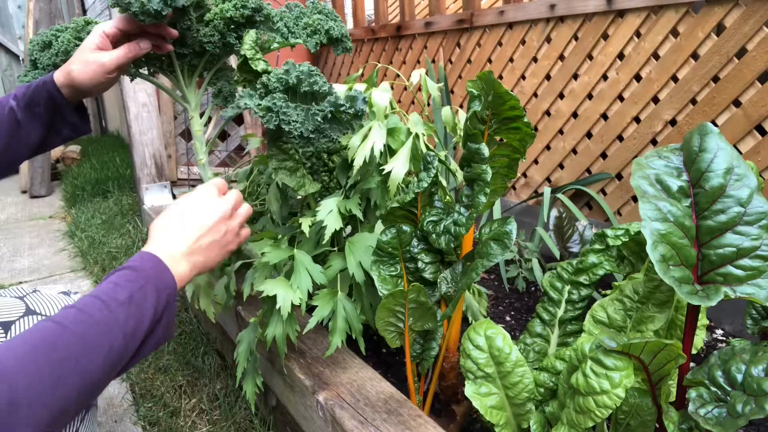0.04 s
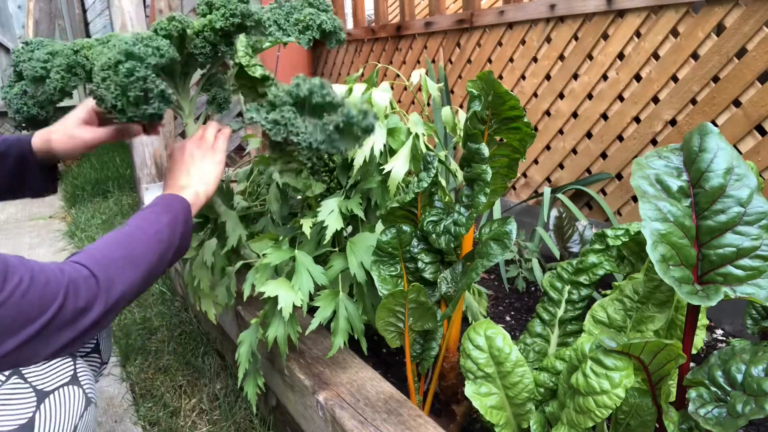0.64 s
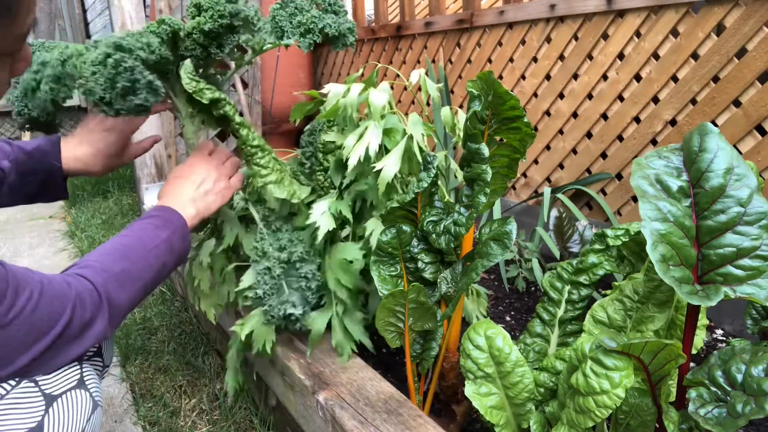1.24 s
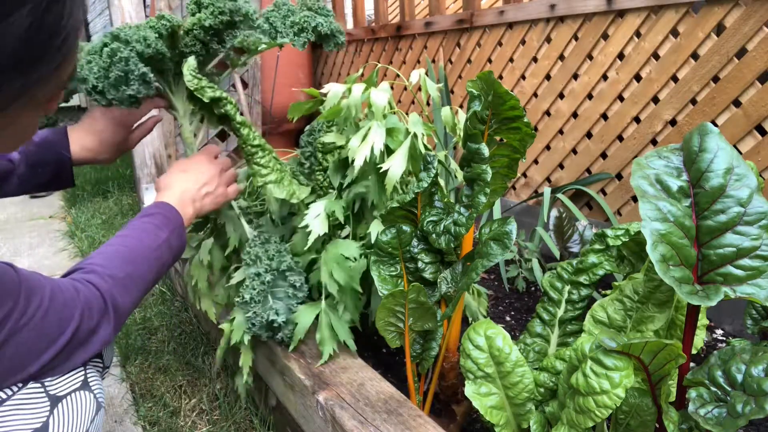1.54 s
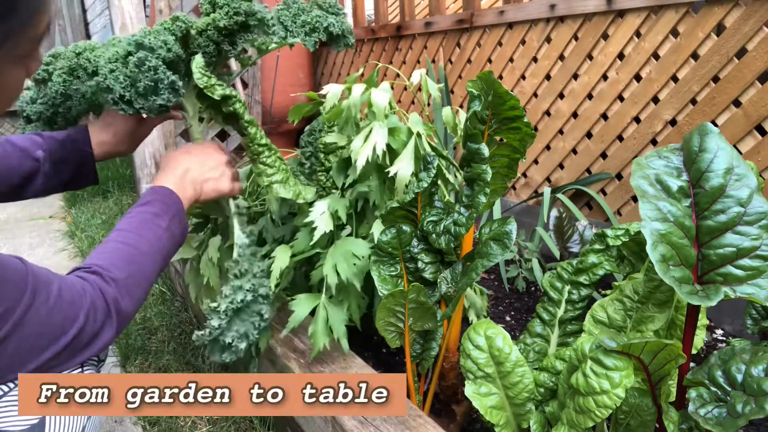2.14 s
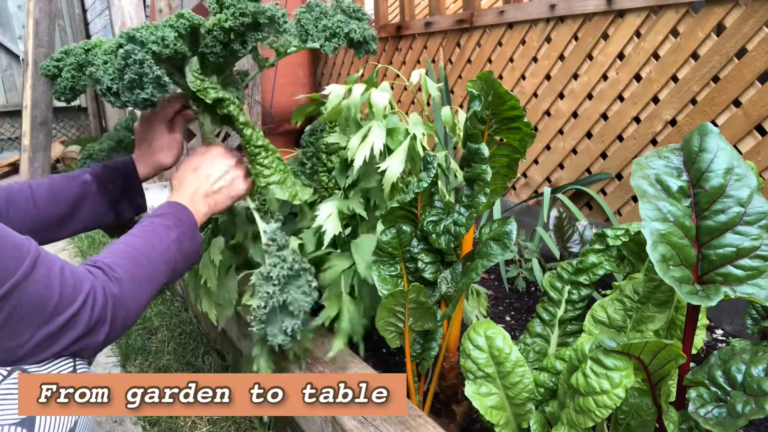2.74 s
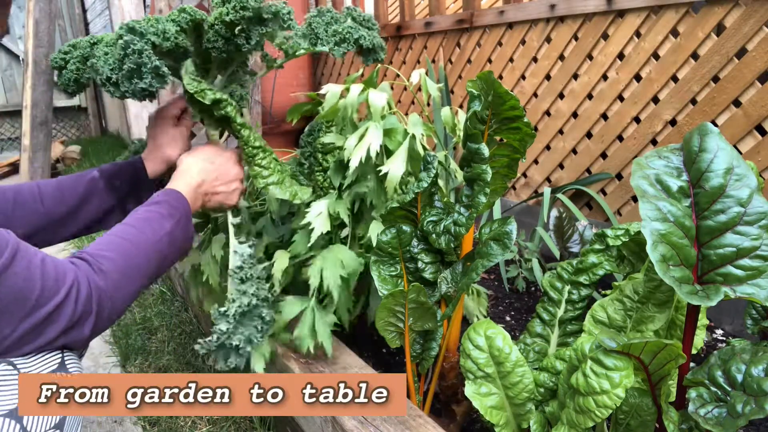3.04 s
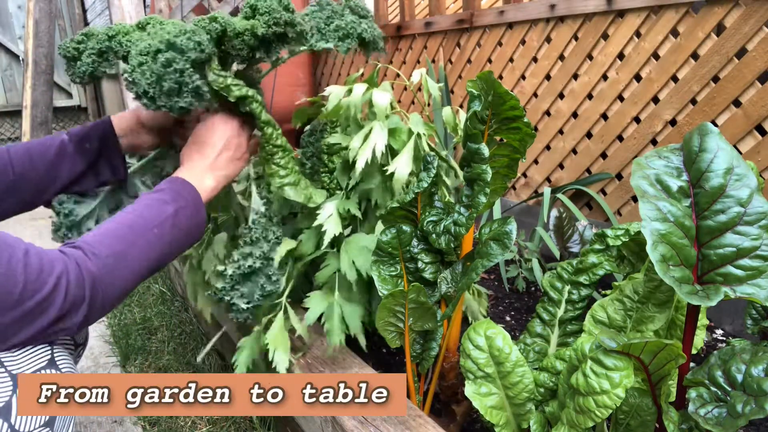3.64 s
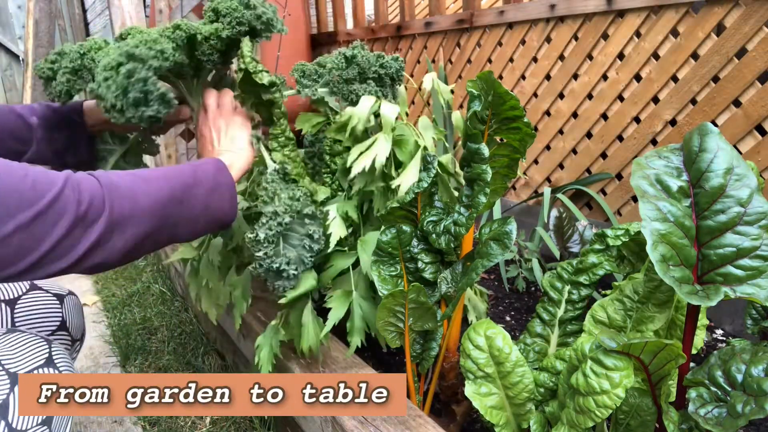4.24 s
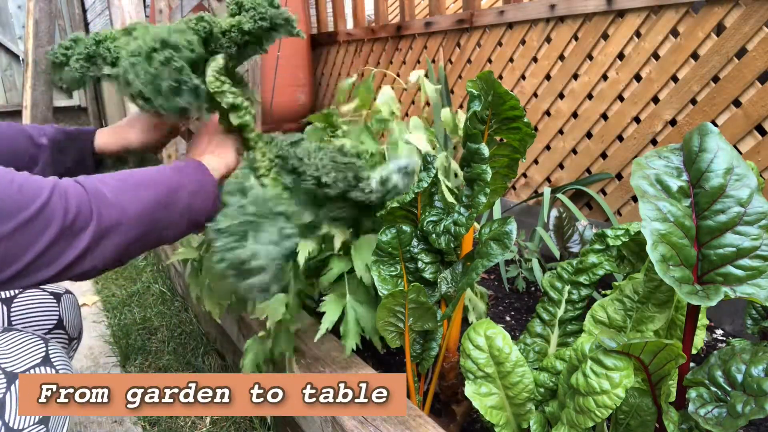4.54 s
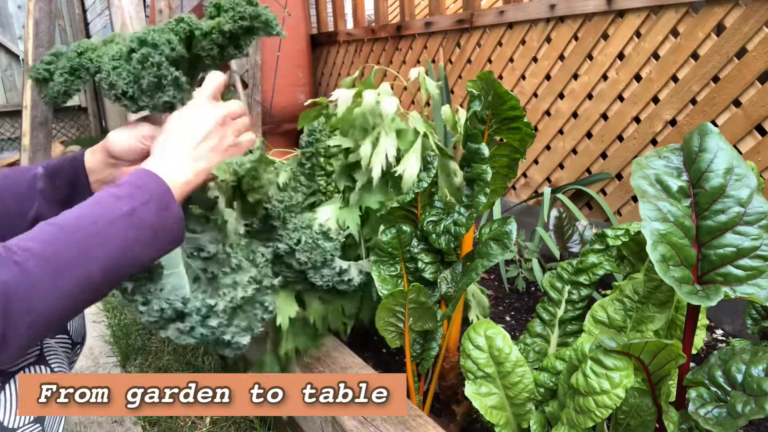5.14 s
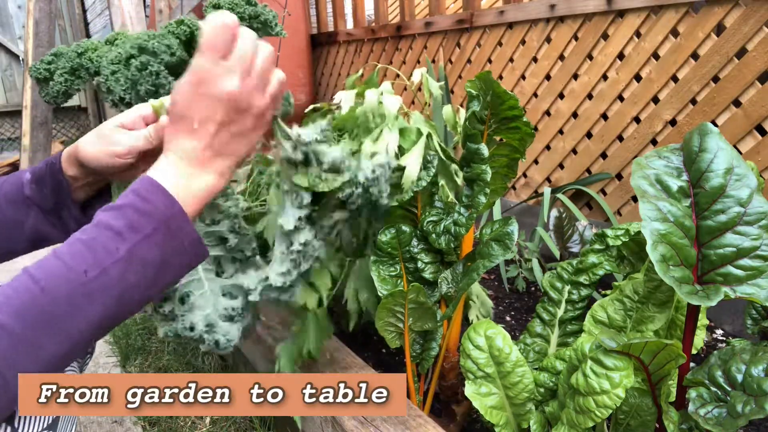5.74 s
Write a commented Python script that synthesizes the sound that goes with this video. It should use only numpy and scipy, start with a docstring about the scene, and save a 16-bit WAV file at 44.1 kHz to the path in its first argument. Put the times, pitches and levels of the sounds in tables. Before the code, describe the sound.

Hands pick curly kale in a quiet garden, with crisp stem snaps between bouts of leaf rustling that grows louder toward the end.

```python
"""Kale is picked by hand in a small fenced garden, over quiet outdoor air and a faint motor hum.
Curly leaves crinkle and rub; at 1.3 s a stem snaps in a run of bursting fibres and the stalk thumps back.
A lighter snap follows, then a far engine swells and fades around the next big snap at 3.1 s.
The last stem goes at 4.3 s, and the leaves rustle at their loudest to the end, with small cracks.
The bed and the fence scatter the snaps and the rustle."""
import sys
import numpy as np
from scipy import signal
from scipy.fft import rfft, irfft
from scipy.io import wavfile
from scipy.ndimage import uniform_filter1d

SR = 44100
rng = np.random.default_rng(int(sys.argv[2]) if len(sys.argv) > 2 else 0)


def put_to_file(sound):
    """Save the sound as 16-bit audio at rate SR, in the file named by the first command-line argument."""
    columns = np.atleast_2d(sound).T  # one column per channel
    safe = np.clip(columns, -1, 1)
    whole_steps = np.round(safe * 32767)
    wavfile.write(sys.argv[1], SR, whole_steps.astype(np.int16))


N = 254898
T = np.arange(N) / SR

# Tone of the outdoor air. Each row: frequency in Hz, level in dB.
AIR_TONE = [(15, -63), (25, -31), (53, -7), (123, -2.5), (161, -5.5), (242, -6), (516, -13), (575, -8),
            (624, -9.5), (818, -13), (1100, -13.5), (1330, -17.5), (5730, -25.5), (16000, -35)]
# The far engine's swell and fade. Each row: time in seconds, level in dB.
ENGINE_SWELL = [(0, -82), (2.1, -71), (2.7, -63), (3.75, -63), (4.3, -69), (5.78, -76)]
# Soft bumps of hands and swinging stalks. Each row: start in seconds, level in dB, pitch in Hz,
# decay in seconds.
SOFT_KNOCKS = [(3.094, -48, 268, 0.04), (3.683, -42.5, 420, 0.011), (4.318, -41, 260, 0.021),
               (5.547, -43.5, 231, 0.044), (5.639, -51, 212, 0.14)]
# Leaf sliding on leaf. Each row: start and length in seconds, level in dB, first and last pitch in Hz,
# nominal slips per second.
LEAF_RUBS = [(0.517, 0.035, -47.5, 3230, 2740, 500), (0.617, 0.096, -41.5, 1550, 1840, 250),
             (0.72, 0.1, -53.5, 1600, 1900, 430), (0.824, 0.021, -44, 3920, 3500, 700),
             (3.965, 0.028, -48, 1400, 1480, 700), (4.429, 0.062, -38, 2000, 1790, 830),
             (4.819, 0.085, -49.5, 1330, 1390, 114), (4.989, 0.14, -45.5, 1850, 1960, 600),
             (5.144, 0.062, -38.5, 1780, 1700, 600), (5.311, 0.12, -40.5, 4450, 3650, 1350),
             (5.418, 0.068, -35.5, 1800, 2390, 860), (5.492, 0.3, -46, 2470, 2250, 395)]
# A hand moves through the leaves. Each row: start and length in seconds, level in dB,
# swell from start to end in dB, crisp treble in dB.
HAND_STROKES = [(-.05, 0.19, -55, -2.5, -9), (0.338, 0.091, -50.5, -8.5, -6),
                (0.495, 0.096, -43.5, -1.5, -3), (0.584, 0.14, -41.5, 3, -8.5), (0.689, 0.26, -40.5, 1, -5),
                (0.96, 0.18, -47.5, 5, -7.5), (1.18, 0.097, -46, -2.5, -6), (1.503, 0.091, -56, 0.5, -7),
                (1.64, 0.19, -43, -8, -5.5), (1.946, 0.27, -48.5, 3, -5.5), (2.248, 0.2, -46, 6.5, -6.5),
                (2.414, 0.26, -54, 10.5, -7), (2.736, 0.17, -50.5, 10.5, -3),
                (2.903, 0.12, -47.5, -3, -7.5), (3.065, 0.43, -46, -5, -10), (3.505, 0.53, -51, 6, -8.5),
                (4.086, 0.19, -46, 7, -5.5), (4.306, 0.2, -35.5, 6, -8), (4.517, 0.25, -39, 0, -7.5),
                (4.768, 0.13, -45, 4.5, -5.5), (4.932, 0.12, -38.5, 10, -8), (5.053, 0.13, -34, 0, -4.5),
                (5.252, 0.11, -31, -1, -4.5), (5.358, 0.16, -32.5, -5, -6), (5.5, 0.26, -34, 1.5, -3)]
# Tone of crinkling leaves. Each row: frequency in Hz, level in dB.
LEAF_TONE = [(120, -54), (200, -21), (260, -18.5), (450, -17.5), (680, -10.5), (1050, -7.5), (1700, -7.5),
             (3000, -5), (4500, -6), (7680, -7.5), (13300, -11.5), (16000, -19.5)]
# The freed stalk springs back. Each row: start in seconds, peak in dB, final pitch in Hz, rise in seconds.
STALK_THUMPS = [(1.313, -32.5, 225, 0.0043), (3.0612, -28.5, 340, 0.0034), (3.0668, -32, 308, 0.0039),
                (4.2992, -27.5, 384, 0.0039), (4.3035, -28.5, 234, 0.0045)]
# Tone of bursting fibres. Each row: frequency in Hz, level in dB.
FIBRE_TONE = [(40, -47), (120, -14.5), (300, -20), (500, -10), (720, -7.5), (1000, -2.5), (1700, -2),
              (2300, -4), (3600, -1), (5800, -0.5), (7500, 0.5), (9500, -1), (12500, -1), (16000, -9)]
# A few fibres give in a bent stem. Each row: start in seconds, level in dB, tearing time in ms,
# tilt in dB per octave, the stem's ring in Hz, its level against the fibres in dB.
SMALL_CRACKS = [(.410, -43.5, 7.6, -2.5, 3830, -1), (0.461, -43, 22, -3, 4200, -7),
                (0.52, -43.5, 1.2, -3, 2880, 0), (1.635, -48.5, 2.3, -4.5, 4000, -20),
                (1.8615, -41.5, 1.1, -1.5, 3350, -3), (1.942, -49, 5.6, -0.5, 5000, -3),
                (2.1587, -34.5, 1.6, -1, 1250, -4), (2.395, -46, 2, -3, 4100, 3),
                (3.08, -30.5, 12, 2, 3830, -10), (3.095, -30, 2.8, -1, 1300, -15),
                (3.112, -38, 48, -0.5, 3830, 3), (3.29, -47.5, 2.0, -2.5, 2580, -5),
                (3.4916, -33, 2.8, 0.5, 3070, -7), (3.7553, -39.5, 2, -0.3, 3500, -26),
                (4.2177, -41.5, 0.99, -5, 3540, 12), (4.4806, -28, 3.5, 1, 3430, -6),
                (4.6258, -25, 2.6, -1.1, 4760, -7), (4.6673, -32, 2.8, -3, 880, -13),
                (5.254, -41.5, 3, -3.5, 1510, -6), (5.531, -31, 9, -3, 2980, -5)]
# A stem snaps. Each row: start in seconds, level in dB, tearing time in ms, tilt in dB per octave, treble
# edge in Hz, then the low, middle and high ring, each as pitch in Hz and level against the fibres in dB.
STEM_BREAKS = [(1.3126, -15, 3.2, 0.33, 13200, 1290, -11, 2430, -15, 8400, -10.5),
               (1.6696, -26.5, 1.2, -0.3, 14500, 1400, -6, 3400, -1, 9100, -1),
               (3.0612, -13.5, 1.27, 0.48, 8800, 1130, -9, 3800, -2, 7300, -1),
               (3.0649, -18, 1.8, 0, 8400, 1010, -5.5, 3620, 3, 5000, 2.5),
               (4.2983, -14, 1.7, -0.32, 9550, 1290, -6.5, 3280, -11, 7500, -6.5)]

AIR_DB, HUM_HZ, HUM_DB, ENGINE_HZ = -55.5, 121, -65, 79
ATTACK_S, RELEASE_S = 0.053, 0.061  # an ordinary stroke takes up the leaves and lets them settle
ORDINARY_DB, HALVING_DB = -47.5, 11.5  # that stroke's level; each step louder halves both times
REST_DB, REST_CRISP_DB = -78, -6  # leaves that are only held
UNEVEN_DB, UNEVEN_HZ = 0.54, 21.94  # unsteady hands
RECOIL_DB, RECOIL_S = -22, 0.054  # the plant shakes after a break: level against the break, decay
DULL_DB, FIRM_DB, DULL_PER_DB = 1.83, -37, 0.0678  # dull brushing in a firm stroke; a light touch adds more
FLICKER_DB, RUB_WIDTH_HZ = 2.3, 850  # a leaf fold's level wander, and the width of its resonance
CRACKLE_RATE, CRACKLE_DB = 70, -13  # buckling curls per second; level against the stirring
CRACKLE_FULL_DB = -37  # stirring at which the crackles stop growing
THUMP_GLIDE = 0.9  # share by which a thump starts above its final pitch
SHUDDER_DB, SHUDDER_S = -12.5, 0.037  # the stalk's shudder: level against the thump, decay
RING_OCTAVES, RING_NARROWING = 0.26, 0.41  # a stem ring's spread at 1 kHz; power that sharpens higher rings
BEND_MS = 1.065  # lag of a bending wave at 1 kHz along the stalk
CRACK_EDGE_HZ, TOP_HZ = 14300, 15900  # treble edge of the small cracks, and of the whole mix


def undb(db):
    """Decibels to gain."""
    return np.exp(np.asarray(db) * (np.log(10) / 20))


def unit(x):
    """Scale to an rms of one."""
    return x / np.sqrt(np.mean(x ** 2) + 1e-18)


def band(x, low_hz, high_hz, order=2):
    """Smooth band-pass."""
    return signal.sosfilt(signal.butter(order, [low_hz, high_hz], "band", fs=SR, output="sos"), x)


def colour(x, points, size=4096):
    """Minimum-phase EQ through (Hz, dB) points, so attacks stay sharp."""
    hz, db = np.transpose(points)
    octave = np.log2(np.maximum(np.fft.rfftfreq(size, 1 / SR), 1))
    gain_db = np.interp(octave, np.log2(hz), db)
    cepstrum = irfft(np.log(undb(gain_db)))[:size // 2]
    cepstrum[1:] *= 2
    response = irfft(np.exp(rfft(cepstrum, size)))
    return signal.fftconvolve(x, response)[:len(x)]


def walk(rate):
    """Smooth random drift with an rms of one and `rate` turns a second."""
    hold = int(SR / rate)
    steps = np.repeat(rng.standard_normal(N // hold + 1), hold)
    return unit(uniform_filter1d(steps, hold)[:N])


def grains(rate, spread_db, size):
    """Clicks of uneven strength at random moments."""
    strength = undb(spread_db * np.minimum(rng.exponential(size=size), 4))
    return (rng.random(size) < rate / SR) * rng.choice([-1, 1], size) * strength


def background():
    """A bed of outdoor air, a nearby motor's hum and a far engine's wavering drone."""
    air = unit(colour(rng.standard_normal(N), AIR_TONE)) * undb(AIR_DB + 0.69 * walk(4.31))
    hum = unit(np.sin(2 * np.pi * HUM_HZ * T)) * undb(HUM_DB + 1.1 * walk(3.96))
    engine_hz = ENGINE_HZ + 0.55 * walk(4.55)
    engine_db = np.interp(T, *np.transpose(ENGINE_SWELL))
    engine = unit(np.sin(2 * np.pi * np.cumsum(engine_hz) / SR)) * undb(engine_db)
    return air + hum + engine


def scatter(near_db, near_t60, fence_db, fence_t60, size=16384):
    """Echo response: quick scatter from the bed and plants, then a duller wash from the fence."""
    t = T[:size]
    near = unit(rng.standard_normal(size) * undb(-60 * t / near_t60) * (t > .002))
    fence = signal.lfilter(*signal.butter(1, 10000, fs=SR), rng.standard_normal(size))
    fence = unit(fence * undb(-60 * t / fence_t60) * (t > .009))
    return undb(near_db) * near + undb(fence_db) * fence


def garden(x):
    """The direct sound plus its scatter from the surroundings."""
    response = scatter(near_db=-12.0, near_t60=0.034, fence_db=-18.0, fence_t60=0.42)
    return x + signal.fftconvolve(x, response)[:N] / np.sqrt(len(response))


def knocks():
    """Hands and swinging stalks make fleshy, quickly damped bumps."""
    out, t = np.zeros(N + SR), T[:SR // 2]
    for s, db, hz, decay in SOFT_KNOCKS:
        start = int(s * SR)
        body = unit(band(rng.standard_normal(len(t)), 0.79 * hz, 1.32 * hz, order=3))
        out[start:start + len(t)] += undb(db) * body * np.exp(-t / decay) * (1 - np.exp(-t / 0.0009))
    return out[:N]


def rubs():
    """Waxy leaves stick and slip at an uneven pace, ringing a fold whose pitch slides."""
    out = np.zeros(N + SR)
    pole = np.exp(-np.pi * RUB_WIDTH_HZ / SR)
    for s, length, db, start_hz, end_hz, slip_rate in LEAF_RUBS:
        count, start = int(length * SR), int(s * SR)
        gap, force = rng.standard_normal((128, 2)).T
        moments = (np.cumsum(undb(3.0 * gap)) * SR / slip_rate).astype(int)
        slips = np.bincount(moments, undb(2.7 * force), count)[:count]
        glide = np.exp(2j * np.pi * np.cumsum(np.linspace(start_hz, end_hz, count)) / SR)
        fold = signal.lfilter([1], np.poly([pole, pole]), slips / glide) * glide
        out[start:start + count] += undb(db) * unit(fold.real * signal.windows.tukey(count, .3))
    return out[:N]


def envelope(s, length, attack_s, release_s):
    """Attack, hold and release."""
    return np.clip((T - s) / attack_s, 0, 1) * np.exp(-np.clip((T - s - length) / release_s, 0, 20))


def stirring():
    """Level and crispness of the leaves in dB, driven by hand strokes and the recoil of each break."""
    power = undb(REST_DB) ** 2
    for s, db, *_ in STEM_BREAKS:
        power += (undb(db + RECOIL_DB) * envelope(s, 0, ATTACK_S, RECOIL_S)) ** 2
    crispness = power * REST_CRISP_DB
    for s, length, db, swell_db, crisp_db in HAND_STROKES:
        progress = np.clip((T - s) / length, 0, 1)
        slowness = 2 ** ((ORDINARY_DB - db) / HALVING_DB)
        shape = envelope(s, length, ATTACK_S * slowness, RELEASE_S * slowness)
        stroke = (undb(db + swell_db * (progress - .5)) * shape) ** 2
        power += stroke
        crispness += stroke * crisp_db
    return 10 * np.log10(power) + UNEVEN_DB * walk(UNEVEN_HZ), crispness / power


def flicks(stir_db, count=110, size=512):
    """Single leaf edges spring free with tiny pitched ticks that ride on the stirring."""
    out, t = np.zeros(N + size), T[:size]
    for when, pitch, force in rng.random((count, 3)):
        start, hz = int(when * (N - 1)), 1900 * 4.2 ** pitch
        tick = np.sin(2 * np.pi * hz * t) * np.exp(-t * hz / 2.3)
        out[start:start + size] += tick * undb(min(stir_db[start], -42) + 3.0 + 12.5 * force)
    return out[:N]


def crackles(stir_db):
    """Stiff curls buckle one by one with dry ticks that stand out of the rustle."""
    ticks = unit(band(grains(CRACKLE_RATE, spread_db=1.5, size=N), 1900, 6300))
    return ticks * undb(np.minimum(stir_db, CRACKLE_FULL_DB) + CRACKLE_DB)


def foliage(stir_db, crisp_db, size=2 ** 18):
    """Curly edges catch and flick free in clusters; harder stirring packs the clicks into a hiss."""
    dull_db = DULL_DB + DULL_PER_DB * (FIRM_DB - stir_db)
    rate = 3500 * undb(.6 * (np.minimum(stir_db, -25) + 44.5))
    clicks = grains(rate, spread_db=1.0, size=N) / np.sqrt(rate)
    clusters = unit(clicks * undb(1.35 * walk(140)))
    crinkle = rfft(unit(colour(clusters, LEAF_TONE)), size)
    octave = np.log2(np.maximum(np.fft.rfftfreq(size, 1 / SR), 1))
    rustle = np.zeros(N)
    # each fold of leaf has its own pitch, so quarter-octave bands swell and fade apart
    for centre in np.arange(7, 14.3, 1 / 4):
        fold = irfft(crinkle * np.maximum(1 - 4 * abs(octave - centre), 0))[:N]
        dull = np.clip(np.log2(2700 / 2 ** centre), 0, 1)
        crisp = np.clip(np.log2(2 ** centre / 5000), 0, 1)
        rustle += fold * undb(dull * dull_db + crisp * crisp_db + FLICKER_DB * walk(32))
    return rustle * undb(stir_db)


def stalk(size=8192):
    """The freed stalk springs back with a woody thump that falls in pitch, then shudders briefly."""
    out, t = np.zeros(N + size), T[:size]
    for s, db, hz, rise in STALK_THUMPS:
        pitch = hz * (1 + THUMP_GLIDE * np.exp(-t / rise))
        thump = np.sin(2 * np.pi * np.cumsum(pitch) / SR) * (t / rise * np.exp(1 - t / rise)) ** 2
        shudder = unit(band(rng.standard_normal(size), 0.62 * hz, 2.25 * hz, order=3))
        shudder *= np.exp(-t / SHUDDER_S) * (1 - np.exp(-t / rise))
        start = int(s * SR)
        out[start:start + size] += undb(db) * (thump + undb(SHUDDER_DB) * shudder)
    return out[:N]


def flatten(x, size=4096):
    """Many fibres of all sizes share a break's energy evenly over the spectrum."""
    hz = np.fft.rfftfreq(size, 1 / SR)
    power = abs(rfft(x, size)) ** 2
    centres = 2 ** np.arange(7.5, 14.1, 1 / 4)
    band_power = [np.average(power, weights=np.exp(-(8 * (hz / c - 1)) ** 2)) for c in centres]
    return colour(x, np.column_stack([centres, -10 * np.log10(band_power)]))


def stem_tone(tilt, edge_hz, rings):
    """One stem's EQ as (Hz, dB) points: the broad tone of the fibres with the stem's rings on top."""
    hz = 2 ** np.arange(5.5, 14.4, 1 / 16)
    fibre_hz, fibre_db = np.transpose(FIBRE_TONE)
    tilted_db = np.interp(np.log2(hz), np.log2(fibre_hz), fibre_db) + tilt * np.log2(hz)
    fibres = undb(tilted_db) ** 2 / (1 + (hz / edge_hz) ** 4)
    power = fibres / np.sum(fibres * hz)
    for ring_hz, ring_db in np.reshape(rings, (-1, 2)):
        width = RING_OCTAVES * (1000 / ring_hz) ** RING_NARROWING
        peak = 1 / (1 + (np.log2(hz / ring_hz) / width) ** 2) ** 2
        power += undb(ring_db) ** 2 * peak / np.sum(peak * hz)
    return np.column_stack([hz, 10 * np.log10(power / power.max())])


def bending_waves(x):
    """Low bending waves travel slowly along a stalk, so the bass of a break arrives last."""
    hz = np.fft.rfftfreq(len(x), 1 / SR)
    lag_s = BEND_MS / np.maximum(hz, 280)
    return irfft(rfft(x) * np.exp(-2j * np.pi * np.cumsum(lag_s) * hz[1]))


def snap(db, tear_ms, tilt, edge_hz, *rings, size=16384):
    """Fibres burst in a quick run and the stem rings briefly."""
    ms = np.arange(size) * 1000 / SR
    tearing = np.exp(-(ms / tear_ms) ** 2) + 0.26 * np.exp(-ms / tear_ms / 2.7)
    bursts = unit(flatten(grains(20000, spread_db=-0.5, size=size) * tearing))
    direct = unit(colour(bursts, stem_tone(tilt, edge_hz, rings)))
    # a break radiates differently in every direction, so its echoes merge into a smooth wash
    wash = scatter(near_db=-7.0, near_t60=0.038, fence_db=-14.5, fence_t60=0.17)
    echoes = np.std(wash) * unit(colour(wash, stem_tone(tilt, edge_hz, rings=[])))
    sound = unit(bending_waves(direct + echoes))
    # the level is that of the snap's energy spread over 10 ms
    return undb(db) * np.sqrt(SR / 100 / size) * sound


def stems():
    """Stems crack as they are bent and snap when they give way."""
    cracks = [(s, db, tear_ms, tilt, CRACK_EDGE_HZ, *ring) for s, db, tear_ms, tilt, *ring in SMALL_CRACKS]
    out = np.zeros(N + SR)
    for s, *settings in STEM_BREAKS + cracks:
        sound, start = snap(*settings), int(s * SR)
        out[start:start + len(sound)] += sound
    return out[:N]


def scene():
    """Mono mix of snaps, thumps and handled leaves over the outdoor background."""
    stir_db, crisp_db = stirring()
    leaves = garden(foliage(stir_db, crisp_db) + crackles(stir_db) + flicks(stir_db) + rubs() + knocks())
    return (stems() + stalk() + leaves + background())[None]


def record(dry):
    """Clip the loudest peaks, then cut the very top with a steep low-pass."""
    low_pass = signal.ellip(10, .2, 80, TOP_HZ, fs=SR, output="sos")
    return signal.sosfilt(low_pass, np.clip(dry, -.76, .76))


dry = scene()
out = record(dry)
put_to_file(out)
```